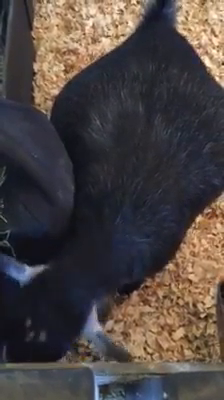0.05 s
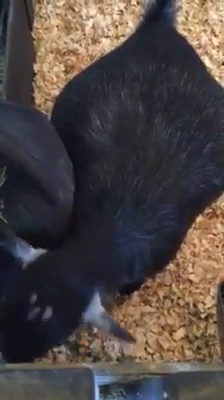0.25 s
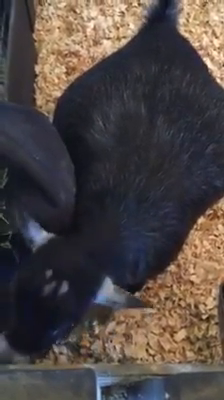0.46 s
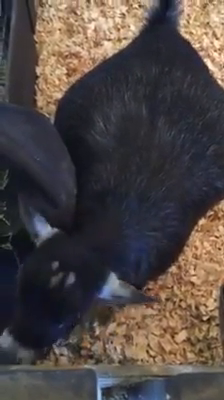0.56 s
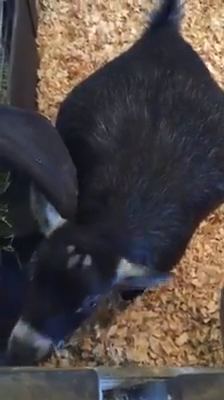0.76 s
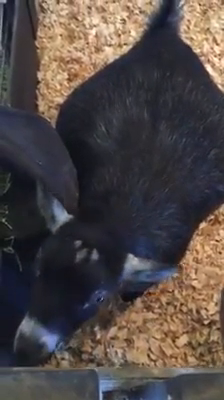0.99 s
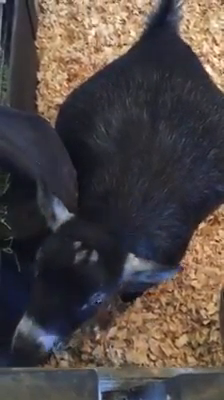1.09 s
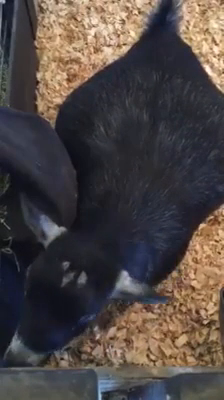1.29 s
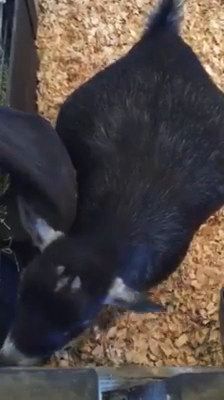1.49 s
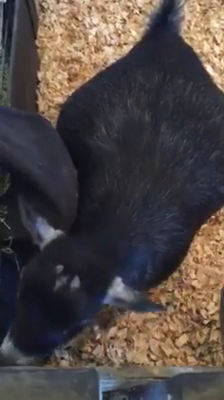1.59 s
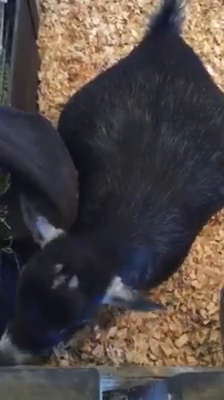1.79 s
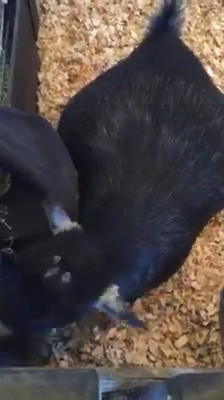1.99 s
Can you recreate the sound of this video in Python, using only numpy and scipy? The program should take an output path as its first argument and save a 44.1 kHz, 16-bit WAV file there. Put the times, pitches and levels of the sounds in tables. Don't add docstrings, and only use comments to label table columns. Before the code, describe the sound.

A single close goat bleat over low, quiet barn hum. Until 0.9 seconds only faint dull floor thuds and dry shavings rustle; a hoof knocks on board near 0.95. From about 1.05 a creaky, closed-mouth nasal moan climbs in pitch, opening around 1.45 into a loud, harsh, throbbing bleat, strongest near 1.65, breaking breathily by 1.8. Brief pen echo, soft thuds, then a small tick and rustle at 2.02.

```python
import sys
import numpy as np
from scipy import signal
from scipy.io import wavfile
from scipy.ndimage import uniform_filter1d

SR = 44100
rng = np.random.default_rng(int(sys.argv[2]) if len(sys.argv) > 2 else 0)


def master(y):
    cut = np.clip(np.atleast_2d(y).T, -1, 1)
    pcm = np.round(cut * 32767)
    wavfile.write(sys.argv[1], SR, pcm.astype(np.int16))


def convert_level_to_amplitude(level_db):
    exponent = np.asarray(level_db, float) / 20
    return 10 ** exponent


N = 90272
T = np.arange(N) / SR

# [f/Hz, level/dB per Hz]
HUM_SPECTRUM = [(30, -91), (55, 9), (100, -3), (210, -9), (360, -22.5), (800, -24.5), (3500, -30),
                (5000, -36), (15000, -44)]
# [start t/s, length/s, level/dB, centre f/Hz,
# width/Hz]
RUSTLES = [(.0, 0.12, -67.5, 2230, 3000), (0.09, 0.16, -64.5, 1740, 700), (0.072, 0.19, -68, 2940, 700),
           (0.152, 0.072, -62, 2050, 3000), (0.445, 0.1, -65, 1410, 1980),
           (0.481, 0.066, -65.5, 2120, 2000), (.9645, 0.064, -56.5, 2600, 3000),
           (.965, .012, -48, 7400, 7000), (0.967, 0.034, -53, 6650, 6960), (0.983, 0.078, -63, 6400, 3000),
           (0.988, 0.086, -59, 1700, 1200), (1.018, 0.21, -71, 9900, 6000),
           (1.759, 0.047, -45.5, 3000, 3000), (2.008, 0.034, -58, 4000, 1500),
           (2.018, 0.015, -51, 7800, 9100), (2.02, 0.0091, -43.5, 4900, 1500),
           (2.026, 0.028, -55.5, 6000, 2000), (2.034, 0.049, -52, 8340, 8060),
           (2.037, 0.03, -47.5, 2200, 2500)]
# [f/Hz, level/dB, t60/s]
TICK_PARTIALS = [(3880, -19, 0.0061), (2500, -45, 0.039), (7700, -37, .006), (10800, -34, 0.0033),
                 (13800, -46, .005)]
# [start t/s, length/s, level/dB, f/Hz]
THUDS = [(0.037, 0.07, -48, 117), (0.11, 0.0098, -71, 140), (0.352, 0.069, -48, 150), (0.41, 0.37, -55, 98),
         (0.52, 0.077, -52.5, 83), (0.656, 0.14, -42.5, 161.8), (.45, 0.076, -63.5, 627),
         (0.165, 0.021, -62.5, 592), (0.041, 0.077, -63.5, 308), (1.28, 0.03, -51, 72),
         (0.905, 0.14, -49, 75), (0.42, 0.19, -69, 83), (1.645, 0.11, -39, 220), (1.963, 0.12, -49.5, 209),
         (0.75, 0.089, -57, 158), (1.1, 0.11, -50, 152), (0.7, .08, -52, 146), (1.9, 0.085, -47.5, 109),
         (1.94, 0.23, -45.5, 91), (0.97, 0.068, -58, 80), (1.266, 0.24, -52, 92)]
# [t/s, level/dB, f/Hz, t60/s]
KNOCKS = [
    (.952, -32.5, 252, 0.11),
    (0.993, -37, 257.7, 0.2),
]

# [t/s, f/Hz]
PITCH = [(1.04, 86.2), (1.13, 95.65), (1.21, 119.51), (1.232, 148.24), (1.254, 103.45), (1.275, 156.04),
         (1.325, 167.9), (1.39, 163.62), (1.425, 182.53), (1.47, 159.27), (1.53, 176.56), (1.58, 179.4),
         (1.62, 168.49), (1.66, 158.64), (1.7, 167.46), (1.8, 135)]
# [t/s, jitter/cycles]
JITTER = [(1.27, .03), (1.3, .015), (1.68, .012), (1.72, .12)]
# [t/s, effort level/dB, roughness 0-1, brightness level/dB]
MOAN = [(1.012, -83, .5, 10.5), (1.05, -58.5, 0.63, 0), (1.072, -43.5, 0, -8.5), (1.105, -37, 0.36, -17.5),
        (1.15, -39, 0.42, -10.5), (1.19, -41.5, 0.42, -6), (1.228, -40.5, 0.2, -2.5), (1.249, -44, .35, -2),
        (1.285, -41, 0.12, -0.5), (1.329, -41.5, 0.15, 1), (1.398, -47.5, 0.42, 4.5), (1.453, -46, 0, 5.5)]
# [t/s, level/dB]
SNAPS = [
    (1.0992, -33.5),
    (1.197, -33),
    (1.223, -37),
    (1.2293, -34),
]
# [f/Hz, width/Hz, level/dB]
NOSE = [(173, 115, -6.5), (328, 103, 4), (570, 166, -16.5), (795, 157, -12.5), (1650, 520, -17.5)]
# (f/Hz, width/Hz, level/dB)
NASAL_RING = (1137, 165, 3.2)
# [f/Hz, width/Hz, level/dB]
SINUS = [(3000, 980, -6), (4120, 820, -7.5), (4710, 780, -14.5)]
# [f/Hz, width/Hz, level/dB]
NOSTRILS = [(5110, 310, -9.5), (6040, 910, -10.5), (7110, 810, -11.5), (9400, 6800, -45),
            (12850, 4400, -43)]
# [f/Hz, width/Hz]
NOSE_DIPS = [(2150, 260), (2450, 300)]
CHEST_TIMES = 1.391, 1.42, 1.46, 1.58
# [t/s, f/Hz, looseness 0-1, level/dB]
LIPS = [(1.285, 2100, 1, -62), (1.32, 1900, 1, -47), (1.39, 1900, 1, -45), (1.41, 2600, .9, -42),
        (1.43, 1700, .8, -43), (1.437, 1560, .1, -29), (1.472, 1720, .2, -28), (1.49, 1800, .3, -45)]
LIP_WIDTHS = 250, 1500

HOLD_TIMES = (1.3, 1.736)
# [t/s, roughness 0-1]
HOLD_ROUGH = [(1.38, .65), (1.42, .95)]
# [peak t/s, rise/s, fall/s, effort level/dB]
THROBS = [
    (1.465, 0.02, 0.019, -21),
    (1.501, 0.016, 0.031, -20),
    (1.534, 0.022, 0.026, -20),
    (1.61, 0.027, 0.025, -22),
    (1.647, 0.024, 0.022, -16),
    (1.678, 0.0083, 0.0093, -21),
    (1.744, 0.021, 0.018, -27.5),
    (1.784, 0.013, 0.0087, -28.5),
]
THROB_ROUGH = .5, .28, .5, .6, .33, .65, .7, .82
# [t/s, level/dB]
CREAKS = [
    (1.748, -35),
    (1.754, -22),
    (1.764, -15.5),
]
# [f/Hz, width/Hz, level/dB]
MOUTH = [(895.4, 120, -0.5), (1262, 73, -11), (2470, 308, -10), (2905, 450, -14.5)]
# [t/s, first f/Hz, first level/dB, throat leak level/dB, second f/Hz, second level/dB]
JAW = [(1.43, 880, -12.5, -17.5, 1480, -19), (1.479, 857, -9.5, -28, 1650, -2.5),
       (1.506, 974, 0, -22, 1650, -4.5), (1.537, 886, -2, -23.5, 1820, -7), (1.56, 944, -8, -41, 1770, -19),
       (1.619, 968, -9.5, -29, 1770, -10.5), (1.649, 997, -1, -25.5, 1716, -6.5),
       (1.741, 957, -5.5, -26, 1600, -23), (1.799, 894, 4.5, -10, 1800, -2)]
# [t/s, f/Hz, level/dB of the upper two]
UPPER = [(1.44, 2120, 1), (1.48, 2410, 2.5), (1.52, 2410, 2.5), (1.6, 2500, -3.5), (1.65, 2475, 2.5),
         (1.72, 2500, -7), (1.79, 2520, 1)]
# [f/Hz, width/Hz, level/dB]
TEETH = [(3526, 425, -18), (4060, 300, -16), (5830, 1780, -28), (9500, 1500, -44), (11700, 2000, -48.5)]
# [f/Hz, width/Hz, level/dB]
THROAT = [(184, 400, -10.5), (372, 91, 5), (625, 390, -2)]
# [f/Hz, width/Hz]
SIDE_CAVITIES = [(425, 60), (450, 70), (4190, 260), (4230, 120), (3710, 130), (3320, 150)]
# [f/Hz, t60/s]
PEN_DECAY = [(300, 0.32), (650, 0.45), (850, 0.61), (1100, 0.46), (1600, 0.41), (2400, .3), (3200, 0.42),
             (8000, 0.29)]


def evened(x):
    return x / np.sqrt(np.mean(x ** 2) + 1e-20)


def read(points, hz):
    f, value = np.transpose(points)
    return np.interp(np.log(hz + 1), np.log(f + 1), value)


def resonate(x, hz, width):
    turn = np.exp(2j * np.pi * np.cumsum(hz * np.ones(len(x))) / SR)
    r = np.exp(-np.pi * abs(width) / SR)
    return 2 * (turn * signal.lfilter([1 - r], [1, -r], x / turn + 1e-18)).real


def steep(x, hz, width):
    return resonate(resonate(x, hz, width), hz, width)


def through(x, tract):
    return sum((-1) ** k * convert_level_to_amplitude(db) * steep(x, hz, width) for k, (hz, width, db) in enumerate(tract))


def bump(start, length):
    u = np.clip((T - start) / length, 0, 1)
    return np.sin(np.pi * u ** 0.47)


def hum():
    frames, hz = N // 256 + 5, np.fft.rfftfreq(1024, 1 / SR)
    a, b, patches = rng.standard_normal((frames, 513, 3)).T
    patches = uniform_filter1d(patches, size=14, axis=0)
    patches = evened(uniform_filter1d(patches, size=12, axis=1))
    z = (a + 1j * b) * convert_level_to_amplitude(read(HUM_SPECTRUM, hz)[:, None] + 1.6 * patches)
    air = signal.istft(z, nperseg=1024, noverlap=768)[1][:N]
    return convert_level_to_amplitude(-57.5) * evened(air)


def rustles():
    crackle_db = 2.4 * np.minimum(rng.exponential(1, N // 32 + 1), 5)
    grain = rng.standard_normal(N) * convert_level_to_amplitude(crackle_db).repeat(32)[:N]
    out = 0
    for s, length, db, hz, width in RUSTLES:
        out = out + convert_level_to_amplitude(db) * bump(s, length) ** 2 * evened(steep(grain, hz, width))
    t = np.maximum(T - 2.02, 0)
    tick = sum(convert_level_to_amplitude(db - 60 * t / t60) * np.sin(2 * np.pi * hz * t) for hz, db, t60 in TICK_PARTIALS)
    return out + np.minimum(t / .001, 1) * tick


def thuds():
    out = 0
    for s, length, db, hz in THUDS:
        out = out + convert_level_to_amplitude(db) * bump(s, length) * evened(steep(rng.standard_normal(N), hz, 39.6))
    for s, db, hz, t60 in KNOCKS:
        t = np.maximum(T - s, 0)
        out = out + np.minimum(t / 0.0055, 1) * convert_level_to_amplitude(db - 60 * t / t60) * np.sin(2 * np.pi * hz * t)
    return out


def folds():
    wobble = evened(uniform_filter1d(rng.standard_normal(N), size=250))
    cycles = np.cumsum(np.interp(T, *np.transpose(PITCH))) / SR
    cycles = cycles + np.interp(T, *np.transpose(JITTER)) * wobble
    cycles = np.maximum.accumulate(cycles)
    shimmer_db = 1.0
    sizes = convert_level_to_amplitude(shimmer_db * rng.standard_normal(1000))[cycles.astype(int)]
    clicks = np.diff(np.floor(cycles), prepend=0) * sizes
    steady_breath = .55
    puffs = (steady_breath + np.exp(-(cycles % 1) / .35)) * sizes * rng.standard_normal(N)
    return evened(clicks - clicks.mean()), evened(puffs)


def blend(clicks, puffs, rough):
    rough = np.clip(rough, 0, 1)
    return np.sqrt(1 - rough ** 2) * clicks + rough * puffs


def strays(rows):
    return sum(10 * convert_level_to_amplitude(db) * (np.arange(N) == round(s * SR)) for s, db in rows)


def moan(clicks, puffs):
    s, db, rough, bright_db = np.transpose(MOAN)
    flutter = uniform_filter1d(rng.standard_normal(N), size=500)
    flutter = evened(uniform_filter1d(flutter, size=500))
    effort = convert_level_to_amplitude(np.interp(T, s, db, -120, -120) + 1.8 * flutter)
    snaps = strays(SNAPS)
    bright = convert_level_to_amplitude(np.interp(T, s, bright_db))

    creak = effort * blend(clicks, puffs, np.interp(T, s, rough)) + snaps
    air = effort * blend(clicks, puffs, .6) + snaps
    high_air = effort * blend(clicks, puffs, .92) + snaps
    low = through(creak, NOSE) + through(creak, [NASAL_RING]) * bright ** 0.59
    high = through(air, SINUS) * bright + through(high_air, NOSTRILS) * bright ** 1.57
    nose = 8.46 * (low + high)
    for hz, width in NOSE_DIPS:
        nose = nose - resonate(nose, hz, width)

    chest = evened(steep(blend(clicks, puffs, .15), 372.8, 45))
    chest = convert_level_to_amplitude(-39.5) * np.interp(T, CHEST_TIMES, [0.0057, 1, 0.63, 0.0465]) * chest

    s, hz, loose, db = np.transpose(LIPS)
    lip_source, lip_hz = blend(clicks, puffs, 0.72), np.interp(T, s, hz)
    tight, slack = [evened(steep(lip_source, lip_hz, width)) for width in LIP_WIDTHS]
    lips = blend(tight, slack, np.interp(T, s, loose)) * convert_level_to_amplitude(np.interp(T, s, db, -120, -120))
    return nose + lips + chest


def bleat(clicks, puffs):
    start, end = HOLD_TIMES
    rise_s, fall_s = 0.034, 0.0049
    hold = np.minimum((T - start) / rise_s, (end + 0.04 - T) / fall_s)
    push = convert_level_to_amplitude(-33) * np.clip(hold, 0, 1)
    drive = push * blend(clicks, puffs, np.interp(T, *np.transpose(HOLD_ROUGH)))
    for (peak, rise, fall, db), rough in zip(THROBS, THROB_ROUGH):
        u = np.clip((T - peak) / np.where(T < peak, rise, fall), -1.5, 1.5)
        throb = convert_level_to_amplitude(db) * np.cos(np.pi * u / 3) ** 2
        push = push + throb
        drive = drive + throb * blend(clicks, puffs, rough)
    cracks = strays(CREAKS)
    drive = drive + cracks

    s, first_hz, first_db, leak_db, second_hz, second_db = np.transpose(JAW)
    _, width, db = MOUTH[0]
    first_source = push * blend(clicks, puffs, .3) + cracks
    first = steep(first_source, np.interp(T, s, first_hz), width)
    first = convert_level_to_amplitude(db + np.interp(T, s, first_db)) * first
    second = steep(drive, np.interp(T, s, second_hz), 475)
    second = convert_level_to_amplitude(np.interp(T, s, second_db)) * second
    fixed_mouth = through(drive, MOUTH[1:2])

    at, third_hz, upper_db = np.transpose(UPPER)
    _, width, db = MOUTH[2]
    third = convert_level_to_amplitude(db) * steep(drive, np.interp(T, at, third_hz), width)
    upper = convert_level_to_amplitude(np.interp(T, at, upper_db)) * (third - through(drive, MOUTH[3:]))

    teeth = through(push * blend(clicks, puffs, .92), TEETH)
    leak_rough = np.interp(T, (1.68, 1.74), (.3, .95))
    leak = through(push * blend(clicks, puffs, leak_rough) + 2 * cracks, THROAT)
    leak = convert_level_to_amplitude(np.interp(T, s, leak_db)) * leak
    return 5.49 * (first - second + fixed_mouth + upper + teeth + leak)


def pen(x):
    taps = np.zeros(SR)
    at = np.arange(300, SR - 20, 20) + rng.integers(0, 20, (SR - 301) // 20)
    taps[at] = rng.choice([-1., 1.], at.shape)
    hz, t, z = signal.stft(taps, SR, nperseg=256)
    decay = convert_level_to_amplitude(-60 * t / read(PEN_DECAY, hz)[:, None])
    tail = signal.istft(z * decay, SR, nperseg=256)[1]
    low_cut = signal.butter(4, 450, "high", fs=SR, output="sos")
    return signal.fftconvolve(signal.sosfilt(low_cut, x), tail / np.linalg.norm(tail))[:N]


def scene():
    clicks, puffs = folds()
    goat = moan(clicks, puffs) + bleat(clicks, puffs)
    for hz, width in SIDE_CAVITIES:
        goat = goat - resonate(goat, hz, width)
    walls = convert_level_to_amplitude(-12) * pen(goat)
    return (hum() + rustles() + thuds() + goat + walls)[None]


def band_limit(x):
    return signal.sosfilt(signal.butter(12, 15500, fs=SR, output="sos"), x)


def record(dry):
    low_cut = signal.butter(2, 50, "high", fs=SR, output="sos")
    high_cut = signal.firwin(511, 15150, window=("kaiser", 9), fs=SR)
    mix = signal.oaconvolve(signal.sosfilt(low_cut, dry), high_cut[None], "same")
    return band_limit(mix)


dry = scene()
out = record(dry)
master(out)
```